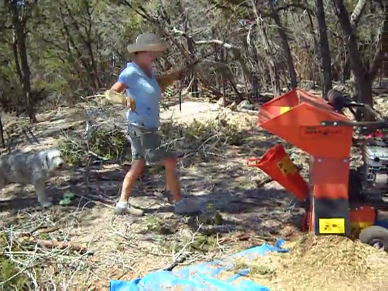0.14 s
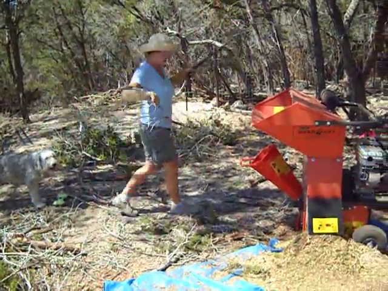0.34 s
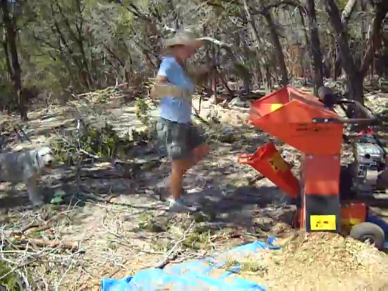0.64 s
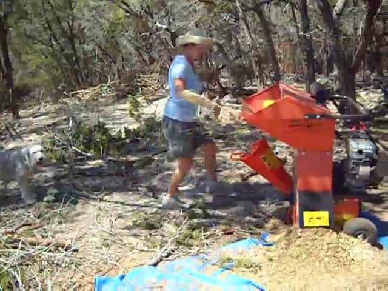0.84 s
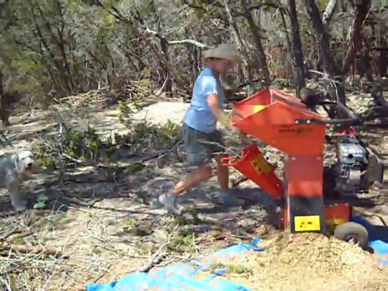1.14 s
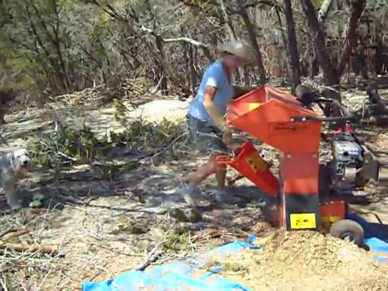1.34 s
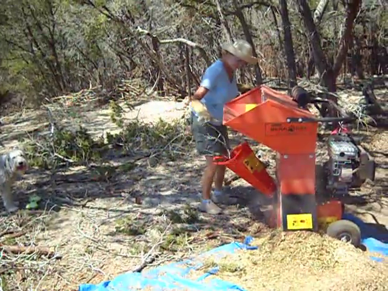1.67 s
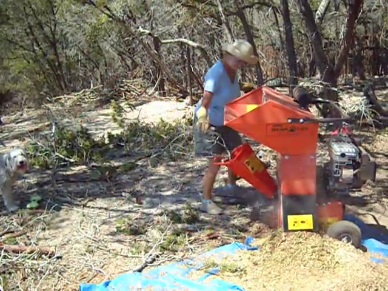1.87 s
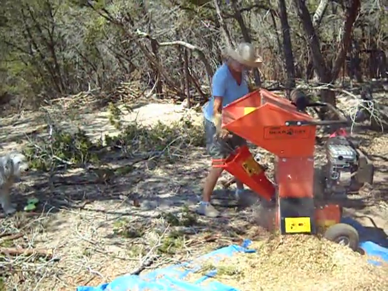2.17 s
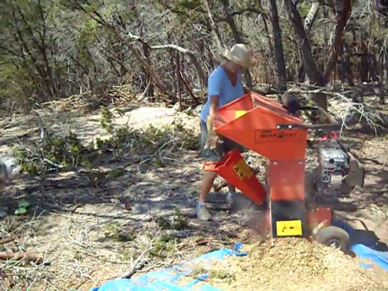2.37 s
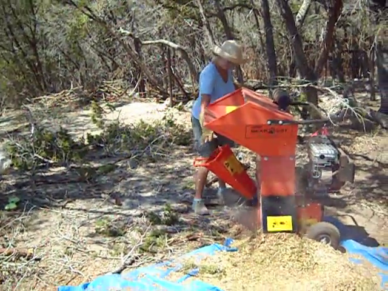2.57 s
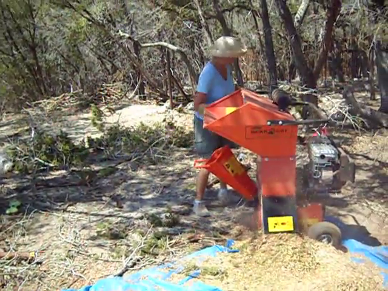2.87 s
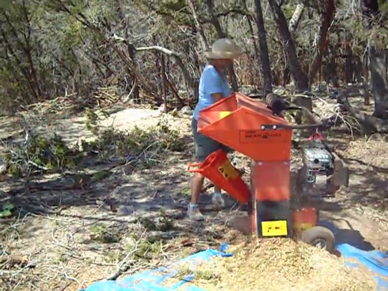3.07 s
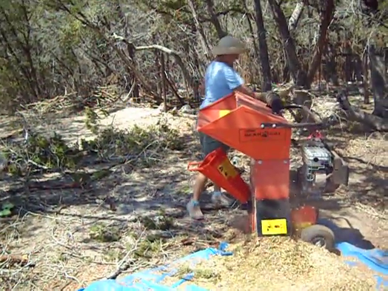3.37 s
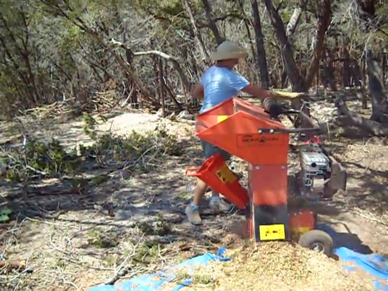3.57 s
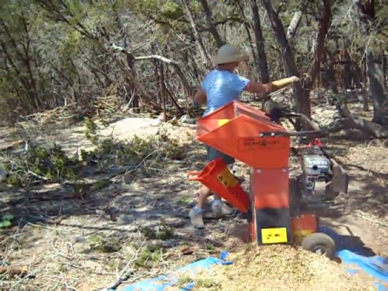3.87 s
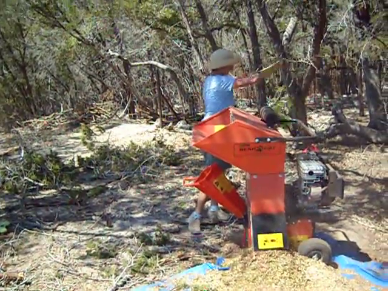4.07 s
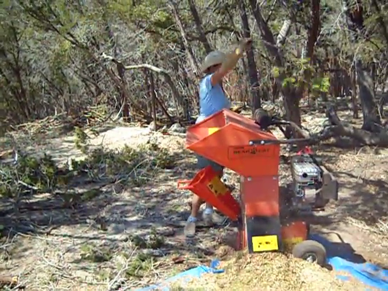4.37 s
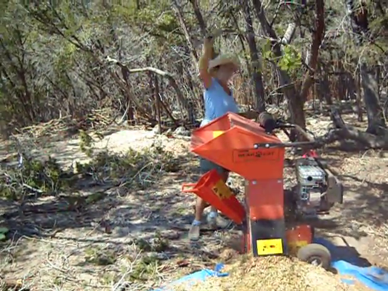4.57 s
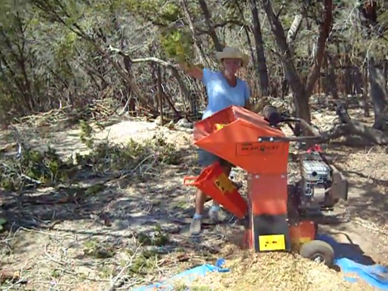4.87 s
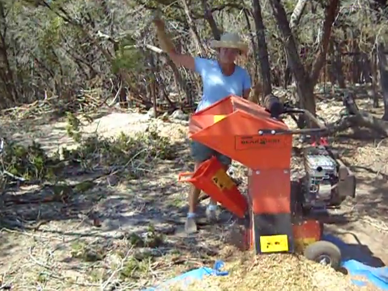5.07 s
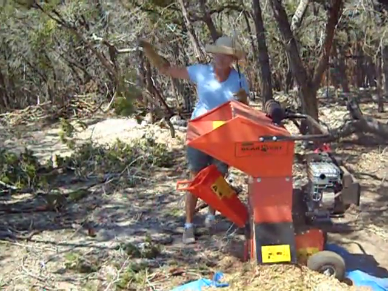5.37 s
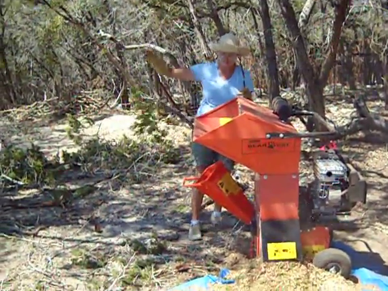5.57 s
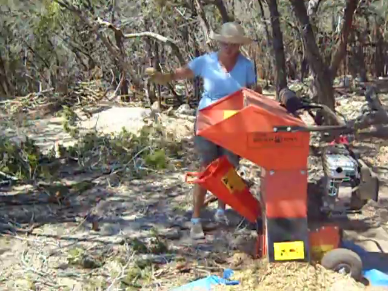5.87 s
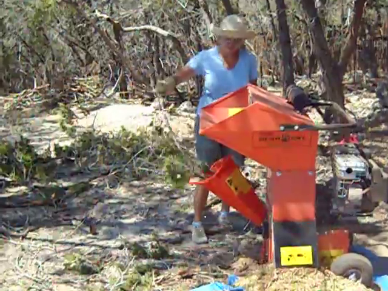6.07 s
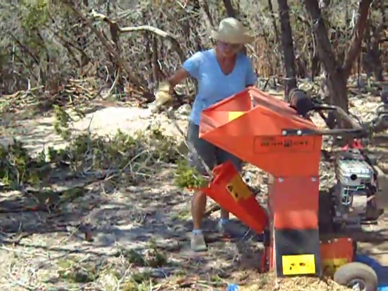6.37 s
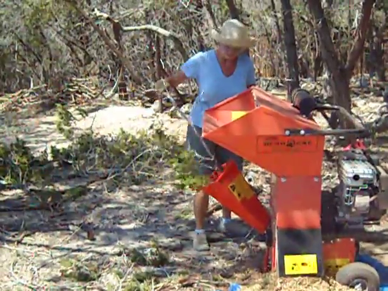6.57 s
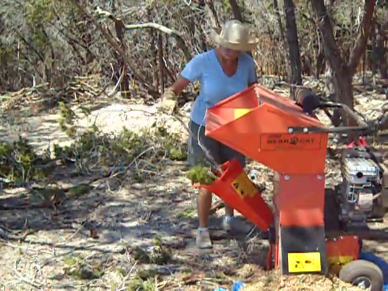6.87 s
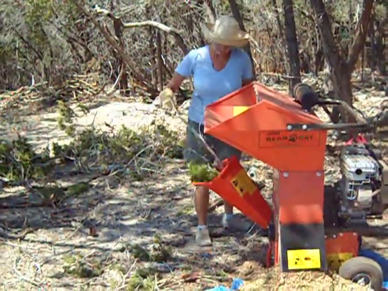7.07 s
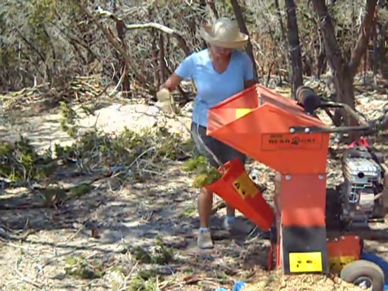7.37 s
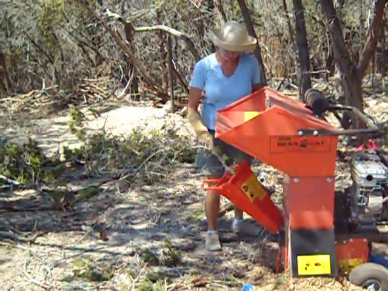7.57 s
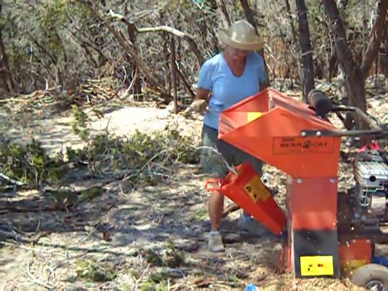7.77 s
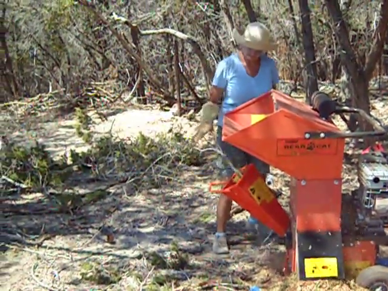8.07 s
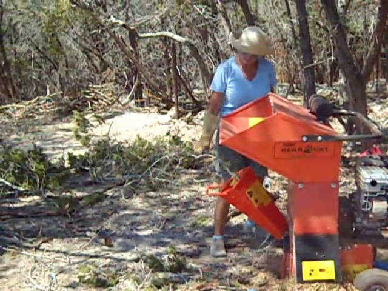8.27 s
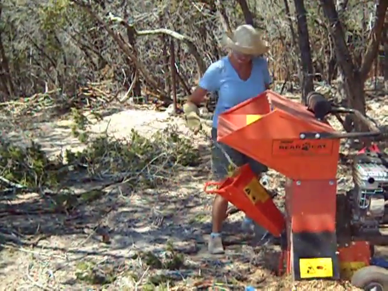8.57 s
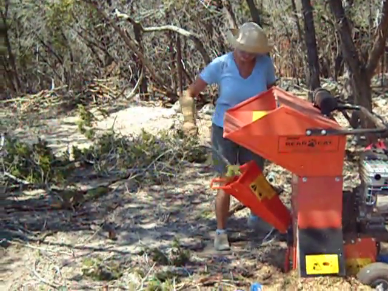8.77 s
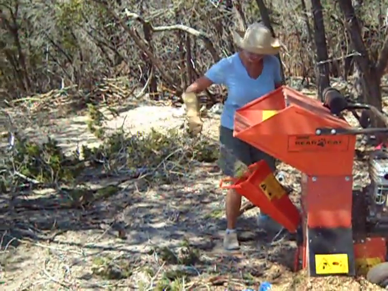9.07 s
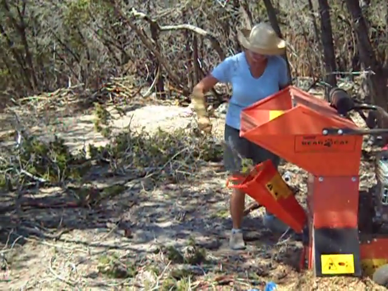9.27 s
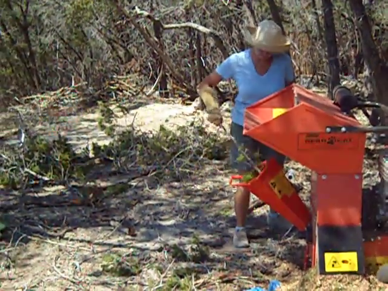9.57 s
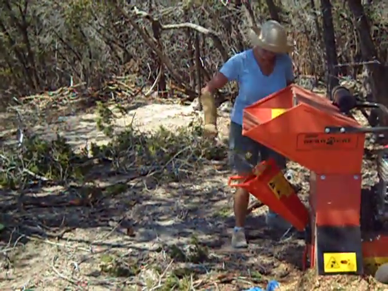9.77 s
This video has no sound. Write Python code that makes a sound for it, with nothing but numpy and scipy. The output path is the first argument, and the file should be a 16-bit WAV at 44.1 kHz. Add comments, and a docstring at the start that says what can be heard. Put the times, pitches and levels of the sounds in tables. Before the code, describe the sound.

A petrol wood chipper drones loudly and steadily outdoors, with short harsh crunching bursts as branches are fed in, heard through an overloaded microphone.

```python
"""In a clearing among trees, a petrol wood chipper drones into a small overloaded microphone.
Engine puffs and rotor air pulses are repeating waves at nearly matching speeds, so their tones beat slowly.
Wood going in drums on the steel housing and splinters: random clicks and noise ring through resonances.
Each piece also drags the speed down and makes the belt slip, until the governor wins the speed back.
Rattling covers, humming panels and rushing air fill in behind, and the trees echo the drone."""
import sys
import numpy as np
from scipy import signal
from scipy.fft import rfft, irfft, next_fast_len
from scipy.io import wavfile
from scipy.ndimage import uniform_filter1d

SR = 44100
rng = np.random.default_rng(int(sys.argv[2]) if len(sys.argv) > 2 else 0)


def dump(signal):
    """Clip the signal to [-1, 1] and save it as 16-bit WAV at the path in sys.argv[1]."""
    limited = np.clip(np.atleast_2d(signal).T, -1, 1)
    pcm = np.round(limited * 32767).astype(np.int16)
    wavfile.write(sys.argv[1], SR, pcm)


N = 438354
TIME = np.arange(N) / SR   # seconds

# All levels in the tables are relative; each source sets its own overall level.
# one exhaust puff through the muffler: multiple_of_firing_rate, level_db
EXHAUST_HARMONICS = [(1, -36), (2, -40), (3, -30.5), (4, -17), (5, -23), (6, -25), (7, -31.5), (8, -32),
                     (9, -37), (10, -29), (11, -28.5), (12, -24.5), (13, -27), (14, -31), (15, -32),
                     (16, -36), (17, -35), (18, -39.5), (19, -28), (20, -30.5), (21, -38), (22, -25),
                     (23, -36), (24, -27.5), (25, -33), (26, -28.5), (27, -42.5), (28, -40), (29, -43),
                     (30, -32), (31, -38), (32, -39.5), (33, -33.5), (34, -48.5), (35, -48.5)]
# the rotor's air pulse through the housing: multiple_of_rotor_speed, level_db
ROTOR_HARMONICS = [(1, -43.5), (2, -33.5), (3, -38), (4, -22.5), (5, -33), (6, -25.5), (7, -42), (8, -40.5),
                   (9, -43), (10, -35), (11, -31.5), (12, -31.5), (13, -42), (14, -34), (15, -45),
                   (16, -45.5)]
# rush of air through the machine: pitch_hz, level_db (per Hz)
RUSH_SPECTRUM = [(20, -25.5), (60, -17.5), (110, -11.5), (170, -1.5), (270, -9), (400, -5.5), (500, -2),
                 (720, -7), (1000, -12), (1150, -24), (1500, -18.5), (2400, -23.5), (3500, -22),
                 (4300, -15)]
# hollow tones of hopper and chute: pitch_hz, width_hz, level_db
DUCT_TONES = [(192, 14, 3.5), (391.6, 59, -5), (689, 56, -3), (830, 173, -5), (1262, 100, -14)]
# sheet-metal panels that hum with the engine: pitch_hz, width_hz, level_db
PANEL_TONES = [(180.6, 16, -5), (301, 16, -1)]
# clatter of valve gear and engine covers: pitch_hz, width_hz, level_db
COVER_TONES = [(1996, 120, -4.5), (2174, 67, 1), (2540, 140, -1), (2780, 200, -2), (3170, 168, 4),
               (3250, 166, 2), (3474, 83, -1), (4170, 210, -11)]
# steel housing under the chips: pitch_hz, width_hz, level_db
HOUSING_TONES = [(355, 66, -9.5), (452, 85, -9.5), (561, 140, -9.5), (692.4, 22.1, 4.5), (830.2, 15.8, 1),
                 (884, 13, 0.5), (900, 71, -6), (1075.5, 35, -10.5), (1190, 28, -17), (1344, 63, -15)]
# splitting wood and ringing knives: pitch_hz, width_hz, level_db
SPLINTER_TONES = [(1500, 370, -13), (2092, 170, -1.5), (2580, 110, 0.5), (2929, 43, 4.5), (3220, 200, -1.5),
                  (3700, 550, -6.5)]
# pieces of wood going through the rotor:
# start_s, length_s, drumming_db, splintering_db, speed_lost (firings per second)
WOOD_PIECES = [(1.05, 0.061, -14, -22.5, 0.19), (1.35, .06, -11.5, -20, 0.063),
               (1.396, 0.023, -7.5, -26.5, .04), (2.002, .08, -4.5, -12.5, 0.25),
               (2.137, .11, -7, -15, 0.35), (2.29, .04, -6.5, -14, 0.029), (2.447, .11, -6.5, -16.5, .2),
               (2.746, .22, -19, -31, 0.051), (3.352, 0.37, -21, -28.5, 0.012),
               (4.089, 0.094, -15.5, -22, 0.083), (4.376, .19, -15.5, -22.5, 0.26),
               (4.659, 0.18, -17.5, -24.5, 0.00018), (5.257, .22, -23.5, -26.5, 0.01),
               (5.676, 0.48, -30.5, -29.5, 0.022), (7.495, 0.095, -4, -14, 0.58),
               (7.612, 0.089, -3, -11.5, 0.5), (7.81, 0.066, -12, -24.5, 0.055),
               (8.094, 0.61, -22, -30.5, 0.0095)]
# single sticks that snap: start_s, peak_db
STICK_SNAPS = [(1.098, -27), (1.43, -23), (2.3301, -20), (3.3998, -24), (4.4993, -20.5), (4.558, -18),
               (4.8688, -21), (5.4581, -21.5), (7.8139, -16.5)]

FREE_RATE = 30.151   # firings per second without load
BELT_RATIO = 1.9818   # rotor turns per firing
BELT_SLIP = .6   # rotor turns slipped per firing lost
RECOVER_S = .351   # time for the governor to win back most of the lost speed
MUFFLER_SMEAR = .25   # radians of delay, growing with the square of the harmonic number
PANEL_LAG = 0.16   # the panels swell this share of a beat after the engine
BITE_S, CLEAR_S = 0.012, 0.068   # a crunch sets in, and dies as the chips fly out
TUMBLE_DB, TUMBLE_S = -16.5, 0.77   # a few chips stay behind and tumble round the drum
LITTER_DRUM_DB, LITTER_SPLINTER_DB = -20.5, -41.5   # bark and grit that never leave it
MIC_TOP_HZ, MIC_STOP_HZ, CUTOFF_HZ = 3720, 4450, 15900
OVERLOAD = .71   # amplifier's clipping level


def exhaust(cycles, sag, level_db, uneven_db, jitter, labour, thump, intake_lag_s):
    """Uneven firings puff through the muffler; lost speed opens the throttle for more thump and intake gulps."""
    firing_db = uneven_db * rng.standard_normal(int(cycles[-1]) + 1)
    strength = from_db(firing_db)[cycles.astype(int)]
    puffs = pulses(cycles + jitter * drift(22), EXHAUST_HARMONICS, smear=MUFFLER_SMEAR)
    puffs = puffs * uniform_filter1d(strength, size=64)   # no step between firings
    throttle = np.interp(TIME - .07, TIME, sag)   # the governor answers late
    thumps = signal.sosfilt(signal.butter(2, 65, fs=SR, output="sos"), puffs)
    late_puffs = np.interp(TIME - intake_lag_s, TIME, puffs)
    gulp_band = signal.butter(1, [100, 220], "band", fs=SR, output="sos")
    gulps = signal.sosfilt(gulp_band, late_puffs)
    return from_db(level_db) * (puffs + thump * throttle * thumps + labour * throttle ** 2 * gulps)


def rotor(turns, level_db, waver_db, wobble):
    """Hammers sweep past the screen and pulse the air; turbulence makes their tone waver."""
    loudness = from_db(level_db + waver_db * drift(3.8))
    return loudness * pulses(turns + wobble * drift(3.6), ROTOR_HARMONICS, smear=0.0022)


def chipping(turns, drum_db, splinter_db, bite, knots_db):
    """Knives bite twice a turn, unevenly at knots; sprays of chips ring the housing and the wood cracks."""
    drum, splinter = crunch_levels()
    bites = rms_one(1 + bite * strokes(2 * turns, decay=1.0))
    force = bites * from_db(knots_db * drift(14))
    thuds = resonate(grains(4000, spread_db=1.0) * force * drum, HOUSING_TONES)
    cracks = resonate(grains(5000, spread_db=2.0) * force * splinter, SPLINTER_TONES)
    return from_db(drum_db) * thuds + from_db(splinter_db) * cracks


def crunch_levels():
    """Drumming and splintering strength: each piece sets in, holds while cut, then clears over steady litter."""
    drum_power = from_db(LITTER_DRUM_DB) ** 2
    splinter_power = from_db(LITTER_SPLINTER_DB) ** 2
    for start, length, drum_db, splinter_db, _ in WOOD_PIECES:
        after = np.maximum(TIME - start - length, 0)
        onset = np.clip((TIME - start) / BITE_S, 0, 1) ** 2
        clearing = np.exp(-2 * after / CLEAR_S)
        tumbling = from_db(TUMBLE_DB) ** 2 * np.exp(-2 * after / TUMBLE_S)
        power = onset * (clearing + tumbling)
        drum_power = drum_power + from_db(drum_db) ** 2 * power
        splinter_power = splinter_power + from_db(splinter_db) ** 2 * power
    return np.sqrt(drum_power), np.sqrt(splinter_power)


def snaps(level_db, decay_s):
    """A breaking stick is a sudden burst of noise that fades and rings like splitting wood."""
    burst = 0
    for start, peak_db in STICK_SNAPS:
        fade = np.exp(-np.minimum(abs(TIME - start) / decay_s, 20))
        burst = burst + from_db(peak_db) * (TIME >= start) * fade
    return from_db(level_db) * resonate(burst * rng.standard_normal(N), SPLINTER_TONES)


def speed_sag():
    """Each piece brakes the rotor while it is being cut; the governor pulls the speed back up."""
    braking = 0
    for start, length, _, _, lost in WOOD_PIECES:
        being_cut = (TIME >= start) & (TIME < start + length)
        braking = braking + lost / length * being_cut
    return signal.lfilter([1 / SR], [1, -np.exp(-1 / (RECOVER_S * SR))], braking + 1e-18)


def clatter(cycles, level_db, tap_share):
    """Valves tap twice a cycle over a dense rattle of covers and loose hammers."""
    taps = strokes(2 * cycles - .75, decay=0.075)
    rattle = grains(9000, spread_db=4.0) * (1 + tap_share * taps)
    return from_db(level_db + .5 * drift(16)) * resonate(rattle, COVER_TONES)


def panels(puffs, beat, level_db):
    """Thin panels hum with the engine, swelling and cancelling as crank and rotor drift in and out of step."""
    hum = 0
    for hz, width, db in PANEL_TONES:
        hum = hum + from_db(db) * signal.lfilter(*signal.iirpeak(hz, hz / width, fs=SR), puffs)
    return from_db(level_db) * np.cos(2 * np.pi * (beat - PANEL_LAG)) * hum


def air(cycles, rush_db, duct_db, throb_db, gust_db):
    """Fan air and exhaust gas rush out, throbbing with each firing and sounding the ducts."""
    throb = from_db(throb_db * np.cos(2 * np.pi * (cycles - .05)) + gust_db * drift(7.5))
    ducts = resonate(rng.standard_normal(N) * throb, DUCT_TONES)
    return from_db(rush_db) * coloured(RUSH_SPECTRUM) * throb + from_db(duct_db) * ducts


def through_trees(x, echo_db, delay_s, sway_s):
    """Trunks send the upper tones back over a slowly changing path, so that each swells and fades."""
    upper = signal.sosfilt(signal.butter(2, 250, "high", fs=SR, output="sos"), x)
    echo = np.interp(TIME - delay_s - sway_s * drift(0.58), TIME, upper)
    return x + from_db(echo_db) * echo


def pulses(turns, harmonics, smear):
    """One pulse a turn with the given harmonics: a front, then ringing."""
    size = 2048
    order, db = np.transpose(harmonics)
    k = np.arange(size // 2 + 1)
    # hold the first level below the table and fall off above it
    skirt_db = np.interp(k, np.r_[0, order, 2 * len(order)], np.r_[db[0], db, db[-1] - 25])
    cepstrum = irfft(np.log(from_db(skirt_db)))
    # fold it to one side, so that nothing rings before the pulse
    causal = np.r_[cepstrum[0], 2 * cepstrum[1:size // 2], np.zeros(size // 2)]
    # the smear holds the upper harmonics back
    spectrum = np.exp(rfft(causal) - 1j * smear * k ** 2)
    pulse = irfft(spectrum) * size / np.sqrt(2)
    return np.interp(turns % 1, np.arange(size) / size, pulse.mean() - pulse)


def strokes(turns, decay):
    """A sudden rise once a turn that dies within a share of the turn; rms 1."""
    return rms_one(np.exp(-(turns % 1) / decay))


def grains(per_s, spread_db):
    """Random clicks of uneven size, pushing either way; rms 1."""
    size_db = spread_db * np.minimum(rng.exponential(1, N), 4)
    sizes = from_db(size_db) * rng.choice([-1, 1], N)
    return rms_one(sizes * (rng.random(N) < per_s / SR))


def resonate(x, modes):
    """Bodies that ring at several pitches side by side, scaled so that white noise keeps its power."""
    out, power = 0, 0
    for k, (hz, width, db) in enumerate(modes):
        r = np.exp(-np.pi * width / SR)   # a wider tone dies sooner
        top = (1 - r * r) / 2
        ringing = [1, -2 * r * np.cos(2 * np.pi * hz / SR), r * r]
        tone = signal.lfilter([top, 0, -top], ringing, x + 1e-18)
        out = out + (-1) ** k * from_db(db) * tone   # every other one upside down
        power += top * from_db(db) ** 2
    return out / np.sqrt(power)


def coloured(spectrum):
    """Steady noise with a given spectrum; rms 1."""
    size = next_fast_len(N)
    hz, db = np.transpose(spectrum)
    bins_hz = np.fft.rfftfreq(size, 1 / SR)
    gain = from_db(np.interp(np.log(bins_hz + 1), np.log(hz), db))
    return rms_one(irfft(rfft(rng.standard_normal(size)) * gain, size)[:N])


def drift(rate):
    """Slow random wandering with spread 1; a higher rate wanders faster."""
    # made at every 40th sample, with a run-in of 2000 points, then joined by lines
    r = np.exp(-80 * np.pi * rate / SR)
    noise = rng.standard_normal(N // 40 + 2002)
    slow = signal.lfilter([1], [1, -2 * r, r * r], noise)[2000:]
    return np.interp(np.arange(N) / 40, np.arange(len(slow)), rms_one(slow))


def saturate(x, top, order):
    """Round the peaks off; a higher order gives a harder knee."""
    # an even order treats both sides of the wave alike
    return x / (1 + (x / top) ** order) ** (1 / order)


def from_db(db):
    """Decibels to gain."""
    return 10 ** (np.asarray(db) / 20)


def rms_one(x):
    """Scale to unit power."""
    return x / np.sqrt(np.mean(x ** 2) + 1e-20)


def scene():
    """The engine's speed times everything that turns; the belt slips more as the load pulls it down."""
    sag = speed_sag()
    rate = FREE_RATE - sag
    cycles = np.cumsum(rate) / SR + .088   # one cycle per firing
    turns = np.cumsum(BELT_RATIO * rate - BELT_SLIP * sag) / SR + .376   # of the rotor
    beat = 2 * cycles - turns - .36   # turns that the crank has gained on the rotor
    surge = from_db(0.62 * np.cos(2 * np.pi * beat))   # the engine surges when they are in step
    puffs = surge * exhaust(cycles, sag, level_db=-0.38, uneven_db=0.95, jitter=0.00089,
                            labour=1.5, thump=1.8, intake_lag_s=.0131)
    hum = puffs + panels(puffs, beat, level_db=0.3)
    hum = hum + rotor(turns, level_db=0.87, waver_db=1.57, wobble=0.0017)
    drone = through_trees(hum, echo_db=-11.5, delay_s=.016, sway_s=0.00075)
    wood = chipping(turns, drum_db=0.0, splinter_db=0.0, bite=0.97, knots_db=1.0)
    wood = wood + snaps(level_db=3.5, decay_s=0.02)
    roar = clatter(cycles, level_db=-23.5, tap_share=0.25)
    roar = roar + air(cycles, rush_db=-17.5, duct_db=-23.0, throb_db=1.0, gust_db=0.5)
    return (drone + roar + wood)[None]


def record(dry):
    """The capsule rounds the peaks and dulls the sound; the amplifier after it clips, which spits faint treble."""
    rounded = saturate(dry, top=0.74, order=8)
    dull = signal.sosfilt(signal.cheby1(8, .3, MIC_TOP_HZ, fs=SR, output="sos"), rounded)
    narrow = signal.sosfilt(signal.ellip(8, .1, 80, MIC_STOP_HZ, fs=SR, output="sos"), dull)
    flat = saturate(narrow, OVERLOAD, order=80)
    edge = signal.sosfilt(signal.butter(1, [4500, 6800], "band", fs=SR, output="sos"), flat)
    softened = flat - 0.48 * edge   # a shallow dip takes the edge off the spitting
    return signal.sosfilt(signal.ellip(10, .1, 80, CUTOFF_HZ, fs=SR, output="sos"), softened)


dry = scene()
out = record(dry)
dump(out)
```